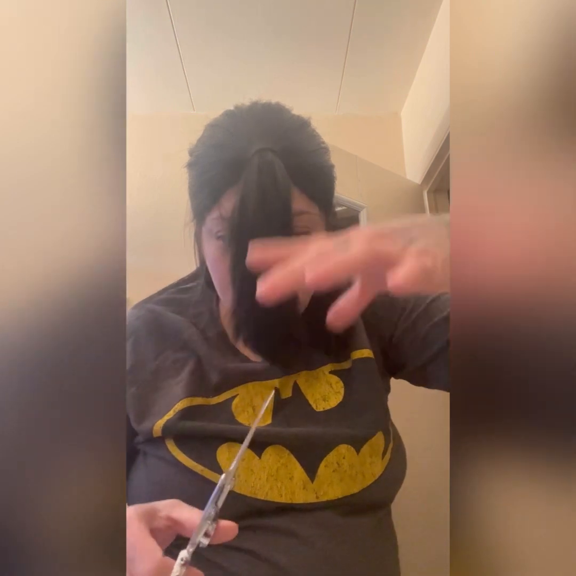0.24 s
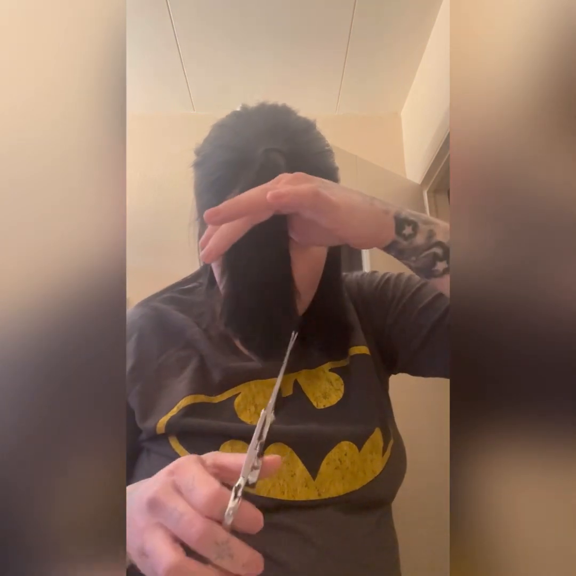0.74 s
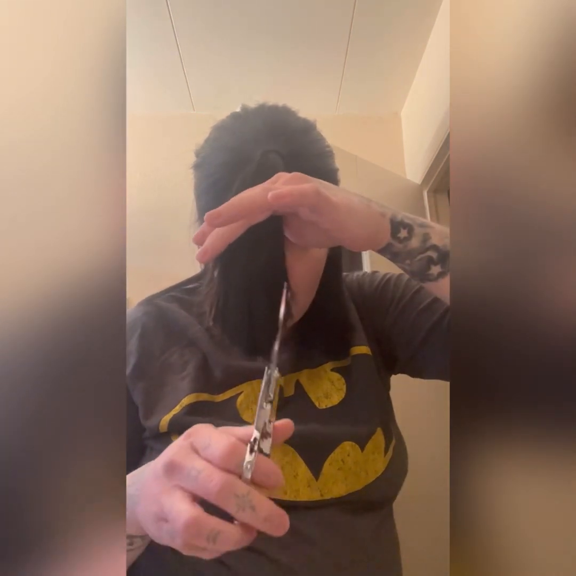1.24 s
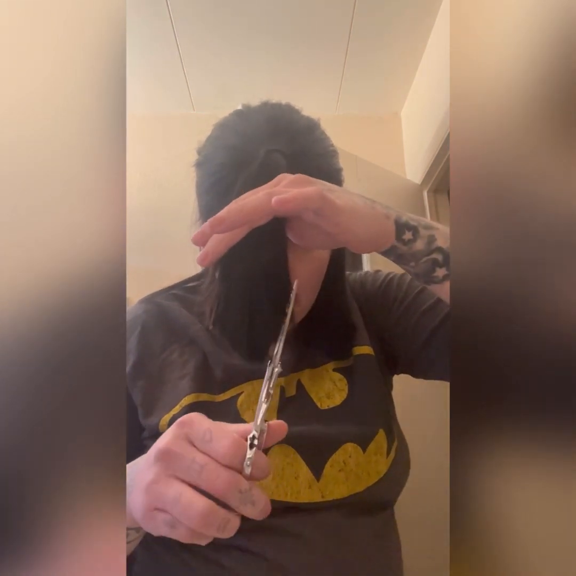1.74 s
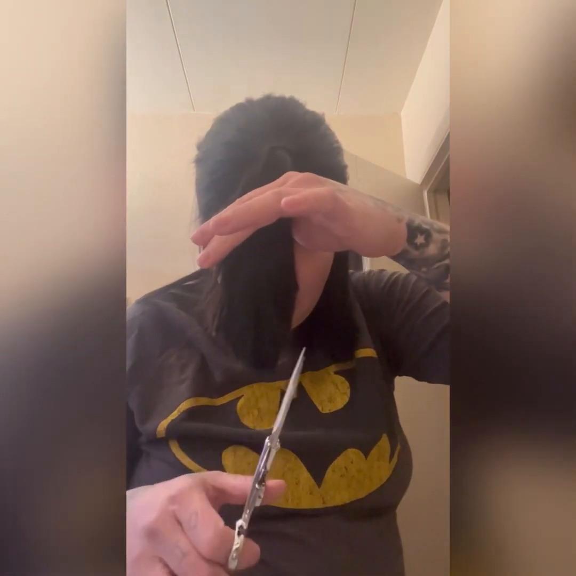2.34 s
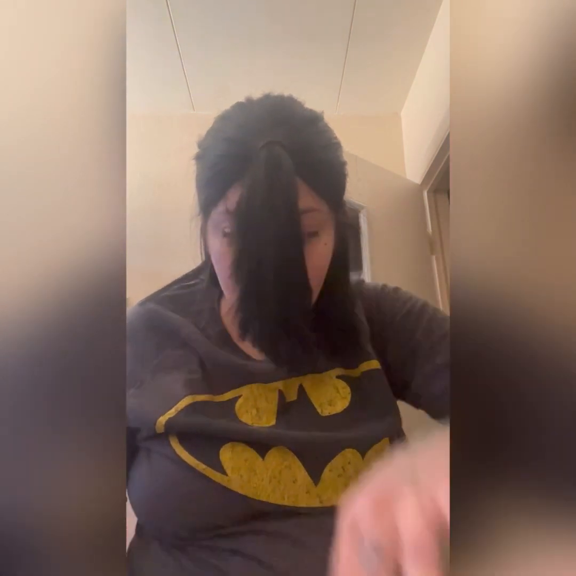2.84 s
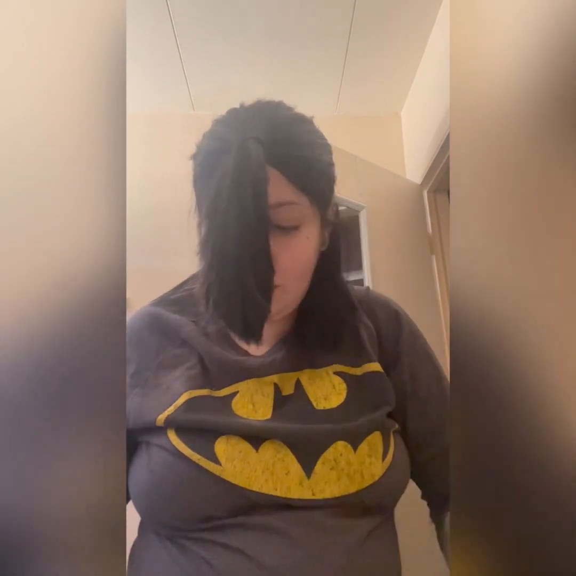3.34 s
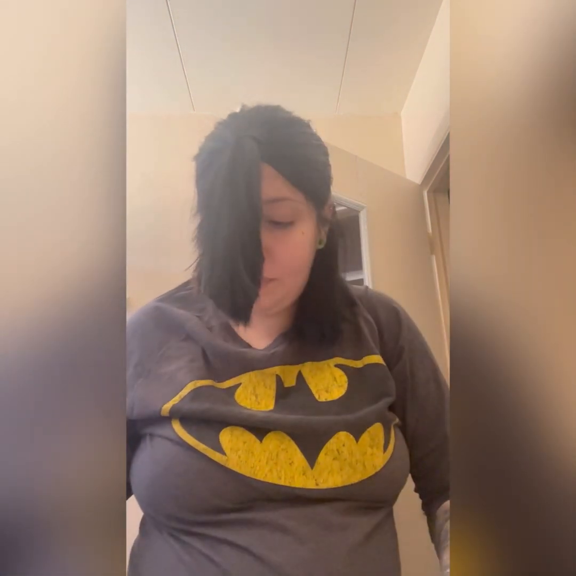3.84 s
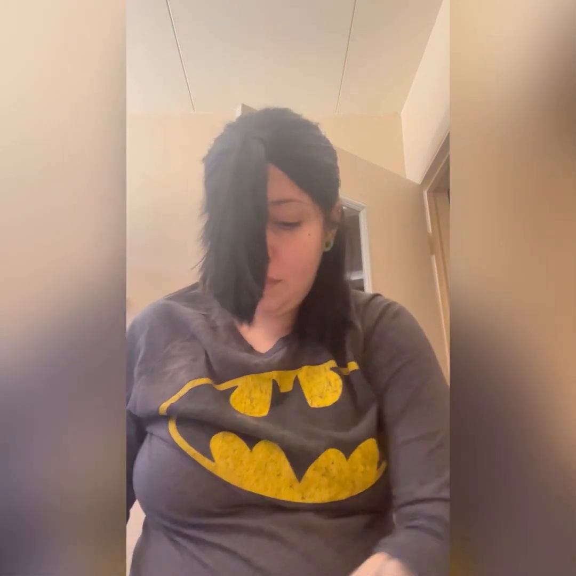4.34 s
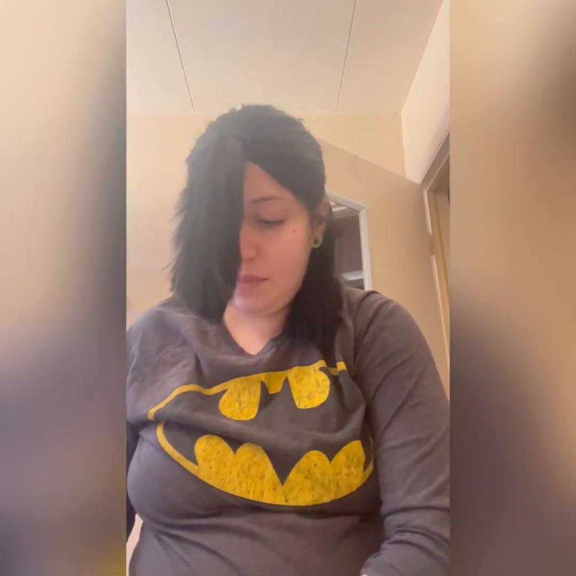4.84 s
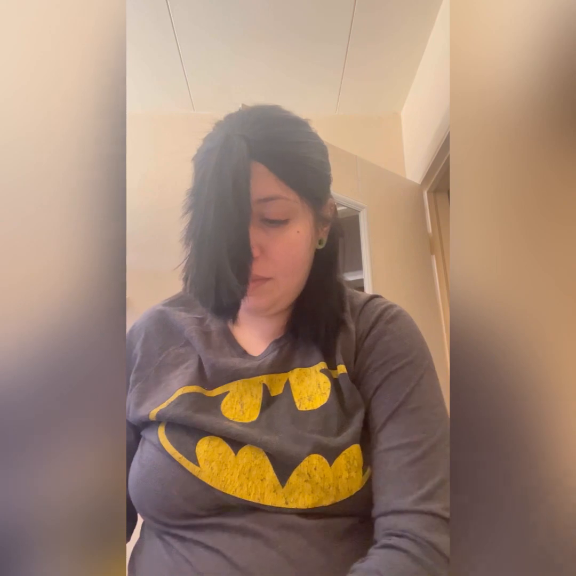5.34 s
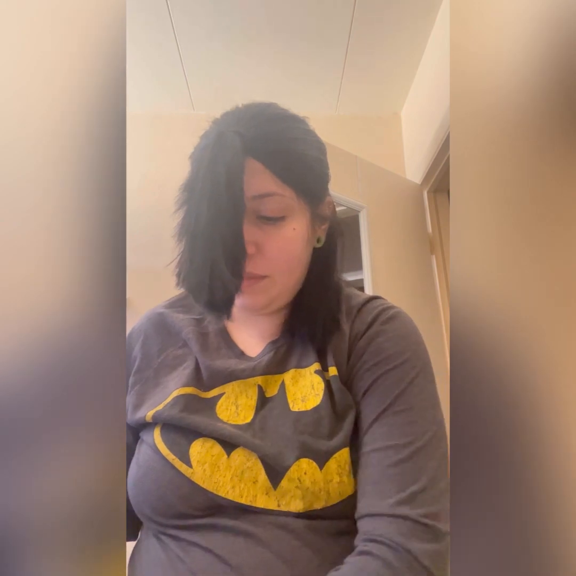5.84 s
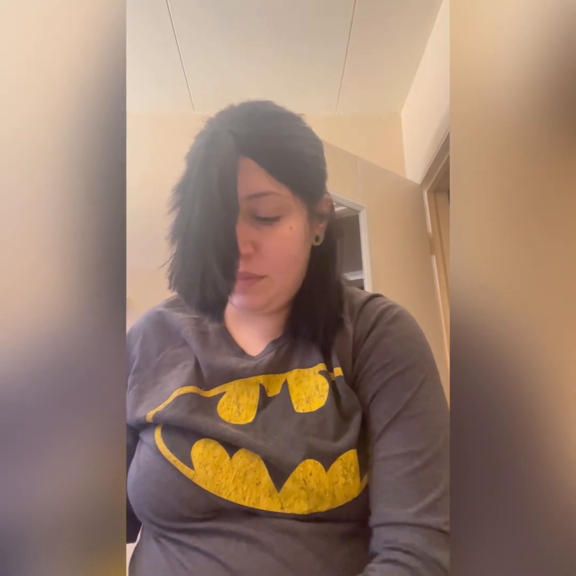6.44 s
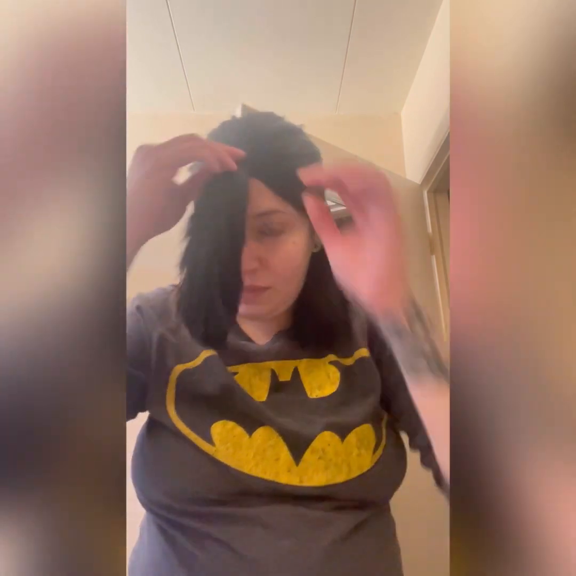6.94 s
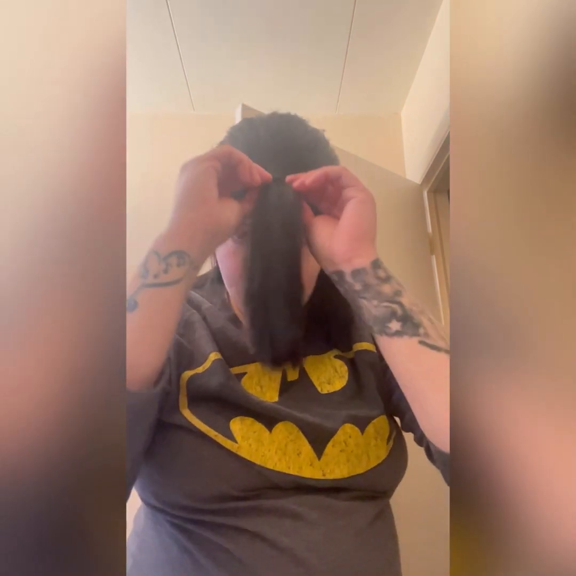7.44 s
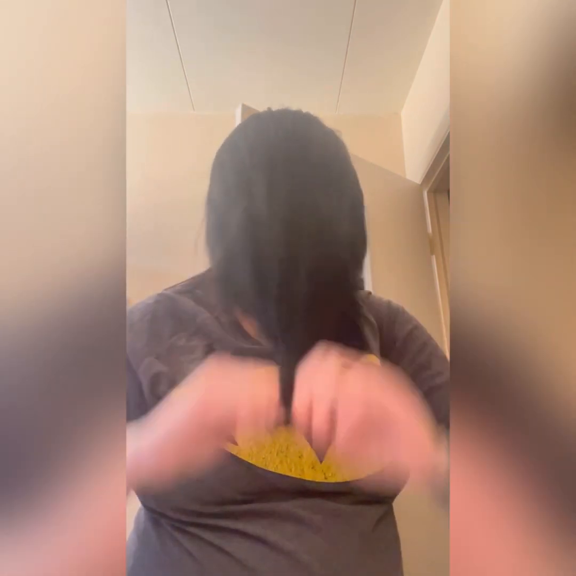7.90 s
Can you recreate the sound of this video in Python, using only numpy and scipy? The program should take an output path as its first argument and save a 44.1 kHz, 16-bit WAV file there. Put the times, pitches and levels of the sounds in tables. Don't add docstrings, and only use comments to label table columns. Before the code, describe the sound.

Quiet blade snips, soft sleeve swishes, then sharp hollow knocks and sliding clatter as scissors are put down, over faint fan drone.

```python
import sys
import numpy as np
from scipy import signal
from scipy.fft import rfft, irfft, next_fast_len
from scipy.io import wavfile

SR = 44100
rng = np.random.default_rng(int(sys.argv[2]) if len(sys.argv) > 2 else 0)


def int16_out(signal):
    q = np.round(np.clip(np.atleast_2d(signal).T, -1, 1) * 32767)
    wavfile.write(sys.argv[1], SR, q.astype(np.int16))


def gain_from_db(level_db):
    decades = np.asarray(level_db, float) / 20
    return 10 ** decades


N = 360297
TIME = np.arange(N) / SR
SIZE = next_fast_len(N + SR // 4)
HZ = np.arange(SIZE // 2 + 1) * SR / SIZE + .001

# (time [s], pitch [Hz], level [dB])
FAN_HUM = [(0.0, 85.2, -63), (0.18, 89.7, -63), (1.41, 89.8, -58.5), (1.57, 89.7, -72.5), (2.07, 93.6, -59),
           (2.21, 86.55, -71.5), (2.499, 93.03, -64), (4.35, 101.1, -70), (4.43, 104.8, -61.5),
           (4.977, 98.5, -67.5), (5.23, 106.3, -70), (5.479, 101.5, -61), (5.921, 105.1, -67),
           (7.67, 105.5, -64), (7.761, 87.2, -75.5), (7.85, 85.4, -67), (7.961, 102.3, -65),
           (8.17, 102.2, -58)]
# (peak time [s], level [dB], rise [s], fall [s])
MOAN_SWELLS = [(1.289, -78.5, 0.66, 0.42), (2.329, -77, 0.94, 0.5), (3.4, -81, 0.4, 0.58),
               (3.89, -63, 0.69, 0.38), (4.5, -61.5, 0.14, 1.35), (4.801, -73.5, .5, 0.61),
               (5.58, -58, 0.4, 0.36), (6.83, -72, 0.94, 0.38), (7.44, -63.5, 0.32, 0.75),
               (7.669, -67.5, 0.19, 1.26), (8.17, -62, 0.44, 0.21)]
# (frequency [Hz], density [dB per Hz])
AIR_SPECTRUM = [(20, -28.5), (40, -11.5), (70, 2), (110, -1), (170, -13.5), (290, -19), (500, -22.5),
                (1000, -33.5), (1900, -33.5), (3000, -39.5), (6000, -41.5), (12500, -46), (14500, -55.5),
                (16000, -61)]
# (time [s], peak level [dB], pitch [Hz], width [Hz], length [ms])
TICKS = [(1.922, -53, 3320, 2480, 3.6), (1.98, -48, 1850, 494, 5), (1.989, -58, 350, 250, 9),
         (1.296, -70, 1500, 300, 27), (3.003, -58, 3750, 200, 9.8), (1.58, -74, 6340, 600, 32),
         (1.68, -72, 7000, 900, 17), (2.986, -59, 1900, 900, 4), (3.287, -50.5, 1790, 705, 1.9),
         (3.329, -57.5, 44.08, 41.6, 16.75), (7.013, -62.5, 5000, 2980, 1.9), (7.267, -56, 2083, 982, 2.1),
         (7.536, -47, 1500, 2510, 9.7), (7.69, -37.5, 531, 308, 3.2), (7.692, -34, 1450, 593, 0.63)]
# (peak time [s], level [dB], rise [s], fall [s])
GRAZES = [
    (1.31, -77.5, 0.11, 0.13),
    (1.44, -81, 0.09, 0.079),
    (1.57, -83, 0.064, 0.13),
    (1.69, -72, 0.16, 0.12),
    (1.8, -83.5, .08, 0.036),
]
# (frequency [Hz], width [Hz], level [dB])
GRAZE_MODES = [(1400, 670, -6.5), (1990, 270, 2)]
# (bite time [s], ring level [dB], hiss above ring [dB], closing [s], letting go [s])
BLADE_STROKES = [(1.634, -82.5, -2.5, 0.079, 0.05), (1.684, -89, 6, 0.043, 0.17),
                 (1.77, -101, 10, 0.15, 0.44), (1.839, -62, -23, 0.014, 0.059),
                 (1.924, -55, -25, 0.011, 0.058), (1.955, -63, -15, 0.048, 0.017),
                 (1.978, -53.5, -15, 0.007, 0.018), (2.144, -77.5, 4, 0.017, 0.062),
                 (2.175, -68, -13.5, 0.053, 0.058), (2.922, -88, 3, 0.015, 0.047),
                 (2.998, -74.5, 7, 0.03, 0.055), (3.474, -81.5, 2, 0.034, 0.022),
                 (3.5, -78, -58, 0.046, .02)]
# (frequency [Hz], width [Hz], level [dB])
BLADE_MODES = [(1130, 280, -11), (1850, 42, 4.5), (2310, 69, -9), (2890, 71, -7), (3570, 84, -3.5)]
GRIND_MODES = [(3900, 450, -8.5), (4800, 1200, -14), (7850, 4100, -12.5)]
HISS_MODES = [(7960, 490, -5.5), (10610, 250, 1), (12150, 580, -9.5), (14200, 2900, -11)]
# (peak time [s], swish level [dB], rub above swish [dB], rise [s], fall [s])
SLEEVES = [(2.62, -83, -34, 0.38, 0.43), (2.9, -70, -16, 0.41, 0.3), (3.215, -70.5, -8, 0.033, 7.2),
           (3.469, -64, -16, 0.36, 1.3), (3.717, -58, -9, 0.5, 0.69), (3.882, -60, -4.5, 0.57, 0.18),
           (4.201, -66.5, -16, 0.69, 1.06), (5.352, -57, -27, 0.076, 0.54), (5.618, -63, -1, 2.4, 0.28),
           (5.901, -70.5, -9.5, 1, 0.27), (6.151, -86.5, 4.5, 1, 7.8), (6.829, -57.5, -14, 0.51, 0.36),
           (7.351, -76.5, 8.5, 0.19, 2.24), (7.701, -58.5, -9.5, 0.65, 1.3), (7.9, -79, -34, 1.1, 0.6),
           (8.1, -78.5, -4.5, 0.32, 0.76)]
# (start time [s], length [s], brush level [dB], sheen above brush [dB])
COMBING = [
    (2.7, 0.33, -105, 11),
    (3.306, 0.5, -110, 29),
    (6.723, 0.32, -104, 13.5),
    (7.1, 0.15, -91, -3.5),
    (7.551, 0.36, -70.5, -4.5),
    (7.925, 0.41, -108, 39.5),
]
# (frequency [Hz], width [Hz], level [dB])
RUB_MODES = [(165, 350, 6), (403, 290, 9.5), (925, 930, -7.5)]
SWISH_MODES = [(1500, 670, -5), (2480, 520, -0.5)]
SHEEN_MODES = [(2710, 730, 4), (3510, 1400, 4), (4620, 2500, -24.5)]
BRUSH_MODES = [(4200, 1800, 9.5), (6280, 330, 13.5), (9350, 12000, 7.5), (13400, 15000, -16)]
# (time [s], peak level [dB], main ring [Hz], thud level [dB], crack level [dB])
KNOCKS = [(3.5045, -31, 1792, -6, -47), (3.7385, -31, 1742, -11, -18), (3.788, -20.5, 1656, -9, -12.5),
          (4.2715, -28.5, 1738, -10, -19), (4.3865, -32.5, 1690, -2.5, -12.5), (4.4592, -6, 1709, -18, -9),
          (4.4655, -20.5, 2412, -39, -19.5), (5.175, -25, 1709, -5, -11), (5.182, -32, 2330, -11.5, -13),
          (5.378, -31.5, 1725, -12.5, -13), (5.412, -22, 1690, -10, -16.5), (5.5245, -30, 2430, -16, -11.5),
          (5.531, -27, 2275, -10, -30), (5.5845, -28.5, 1690, -44.5, -27),
          (5.6192, -28, 1758, -26.5, -15.5), (5.742, -29, 1690, -13.5, -15),
          (5.7465, -32, 1713, -18.5, -20)]
# (time [s], peak level [dB], main ring [Hz])
TAPS = [(3.55, -38, 1895), (3.559, -41.5, 1820), (3.584, -45, 1920), (3.624, -52.5, 2330),
        (3.699, -51.5, 2400), (3.996, -48.5, 1350), (4.048, -59, 2330), (4.0608, -44, 1400),
        (4.079, -56.5, 1320), (4.104, -62.5, 1400), (5.3548, -46.5, 1250)]
BOUNCES = [(3.7957, -27, 2063), (3.813, -26.5, 1853), (4.451, -30, 1720), (4.4744, -17.5, 2063),
           (4.48, -23.5, 2063), (4.505, -34, 1690), (4.7271, -44, 1680), (5.192, -30, 1776),
           (5.197, -44, 1720), (5.2065, -32, 1700), (5.434, -27, 1710), (5.464, -34, 1690),
           (5.536, -31, 1740), (5.626, -32.5, 1710), (5.641, -57.5, 1740), (5.762, -28.5, 1727),
           (5.778, -37, 2063), (5.8417, -40, 1820), (4.076, -50.5, 1360), (5.424, -33.5, 1700),
           (5.445, -35, 1700), (5.485, -46, 1720), (5.634, -34, 1700)]
# (time [s], peak level [dB], pitch [Hz], t60 [s])
PART_NOTES = [(3.507, -48, 978, 0.026), (3.508, -44, 3300, 0.024), (3.55, -47, 927, 0.048),
              (3.552, -57, 3990, 0.04), (3.552, -53, 3150, 0.049), (3.583, -49, 959.5, 0.099),
              (3.626, -48.5, 874, 0.03), (3.742, -41, 3037, 0.03), (3.789, -33.5, 825, 0.065),
              (3.789, -37.5, 392.4, 0.04), (3.792, -30, 3692, 0.067), (3.978, -44.5, 417.6, 0.033),
              (3.998, -49, 414, .05), (3.997, -51.5, 2872, 0.045), (4.029, -65, 416.7, .04),
              (4.063, -61, 400, 0.055), (4.273, -41, 381.3, 0.063), (4.274, -39.5, 1393, .03),
              (4.391, -42, 1300, 0.043), (3.999, -51, 2372, 0.05), (4.276, -55, 5320, 0.3),
              (4.387, -38.5, 757, 0.049), (4.389, -44, 408, .1), (4.461, -30, 3630, 0.04),
              (4.46, -26, 5267, .03), (4.472, -28, 5467, 0.032), (4.463, -31, 412.6, 0.045),
              (4.92, -71, 3700, 0.11), (5.128, -59.5, 4560, 0.21), (5.178, -33.5, 774, 0.043),
              (5.178, -39, 385, 0.0365), (5.177, -26, 1717, .03), (5.184, -36.5, 5400, 0.04),
              (5.21, -44, 818, 0.037), (5.413, -27, 2290, 0.029), (5.413, -39, 763, .05),
              (3.793, -28, 2318, 0.065), (3.82, -59, 5340, .5), (3.995, -67, 5330, 0.21),
              (5.748, -36, 2063, .12), (5.749, -43.5, 324, 0.042), (5.742, -43.5, 826, 0.022),
              (4.776, -53, 1700, .03), (4.775, -61, 2150, 0.066), (3.885, -48, 920, 0.053),
              (5.182, -33.5, 3670, 0.068), (5.357, -52, 760, 0.04), (5.414, -37, 400, 0.0737),
              (5.535, -43.5, 5350, 0.045), (5.623, -40, 3680, 0.052), (5.746, -52, 5400, 0.096),
              (5.523, -36, 2890, 0.022), (5.623, -41, 2410, 0.033), (5.97, -58.5, 1264, 0.25)]
# (pitch [Hz], level [dB], t60 [s])
BODY = [(1910, -13.5, 0.015), (2063, -9, 0.076), (2330, -1.5, 0.04), (1303, -18, 0.04), (1570, -22, .03),
        (2134, -20.5, 0.014), (2480, -17, 0.049), (1250, -25, 0.14)]
THUD = [(136, -3.5, .06), (345, -8, 0.079), (361, 6.5, 0.038), (490, 0, 0.033), (786, 2, 0.025),
        (879.5, 0.5, 0.047), (947, -5, 0.099)]
STEEL = [(3200, -7, .03), (3668, -6, .05), (3840, -8, .05), (4119, -13, .04), (5300, -10, .04),
         (6384, -12, .04), (4560, -11, .05), (2750, -8, .04), (3630, -17, .06), (5331, -17, .09),
         (6100, -14, .03), (5630, -19, .04), (7080, -14, .04)]
# (frequency [Hz], width [Hz], level [dB])
CRACK_MODES = [(2860, 3120, 7.5), (3820, 1400, 2.5), (5666, 1200, 4), (7200, 4200, 4.5), (9500, 2200, -9),
               (12116, 1300, -9)]
# (frequency [Hz], level [dB])
SCUFF_SPECTRUM = [(100, -11), (300, 1), (700, -1), (1300, -2.5), (2200, 2.5), (2800, -4.5), (4000, -7.5),
                  (7000, -20), (12000, -40)]
# (peak time [s], level [dB], rise [s], fall [s])
SLIDES = [(4.894, -59, 0.021, 0.022), (4.912, -65.5, 0.028, 0.019), (4.933, -49, 0.026, 0.02),
          (4.99, -65.5, 0.01, 0.016), (5.01, -64, 0.017, 0.035), (5.033, -58, 0.043, 0.0089),
          (5.06, -55.5, 0.013, 0.016), (5.121, -51.5, 0.0097, 0.028), (5.131, -48.5, 0.0088, 0.073),
          (5.149, -47, 0.017, 0.015), (5.171, -35.5, 0.019, .03), (4.494, -18, 0.027, 0.01),
          (4.467, -16.5, .012, 0.0059), (6.084, -66, 0.074, 0.056), (5.187, -25, .025, .02),
          (5.85, -52, .06, .2), (5.95, -58, .1, .06)]
DRAGS = [(5.79, -47.5, 0.039, 0.091), (5.43, -43.5, 0.018, 0.18), (4.52, -39.5, 0.038, 0.27),
         (5.209, -47.5, .02, 0.13), (3.829, -46.5, 0.029, .2), (3.6, -58, .06, .1), (3.66, -60, .04, .06),
         (4.3, -52, .02, .15), (4.07, -54, .02, .06), (3.93, -56, .05, .08), (5.357, -48, 0.016, 0.055),
         (5.403, -41, 0.04, 0.045), (5.446, -48, 0.016, 0.034), (5.483, -46.5, 0.026, 0.059),
         (5.515, -45.5, 0.022, 0.062), (5.66, -54, 0.011, 0.06), (5.826, -56, 0.017, 0.063),
         (5.868, -52, 0.12, 0.17), (5.919, -59.5, 0.1, 0.05), (5.971, -61, 0.088, 0.035),
         (6.084, -66, 0.097, 0.084)]
# (frequency [Hz], width [Hz], level [dB])
SLIDE_MODES = [(1690, 71, 7), (2330, 150, -15), (3670, 80, -43), (4560, 74, -38), (5370, 27, -40),
               (1260, 20, -8.5)]
DRAG_MODES = [(550, 70, -14), (800, 70, -16), (1290, 60, -4), (1730, 90, 2), (2090, 60, -6), (2270, 80, -5),
              (3680, 90, -18)]
# (octave centre [Hz], t60 [s])
ROOM_T60 = [(125, 0.57), (250, 0.51), (500, 0.72), (1000, 0.32), (2000, 0.15), (4000, 0.3), (8000, 0.33),
            (14000, 0.047)]
# (frequency [Hz], left minus right [dB], right leads by [rad],
# likeness of diffuse sound [0-1])
PORTS = [(20, 4.5, 0, 1), (168, 4.5, 0.5, 0.91), (400, 5, 1.1, .55), (920, 6, 2.6, 0.5),
         (1400, 5.5, 1.6, 0.3), (1700, 9.5, 1.78, 0.7), (2912, 3, 2.3, 0), (3710, 5, 3, 0),
         (5000, 0.14, 4.6, .15), (6500, 0.5, 5, 0.7), (8000, 0.5, 3.2, .95), (10400, 0, 3, 0.95),
         (12500, 1, 0.5, 0.1), (16200, -0.5, -0.3, .4)]
# (frequency [Hz], left minus right [dB], right leads by [rad])
COUNTER_SIDE = [(200, -2, -.2), (400, -8, 0.1), (563, -1.5, 0.7), (795, 0.5, -2), (1099, 3.5, -0.25),
                (1240, -1, -0.2), (2430, 5, 0.8), (5000, 2.5, -0.03), (12900, -6, 0.48)]

MAINS_HZ, MAINS_DB, HUM_FLUTTER_DB = 125, -84, 2.4
MOAN_HZ, MOAN_DB = 281, -98.5
AIR_DB = -68
SWELL_DB = 30
GRIND_DB, GRIND_SHARE = 0, 0.79
FIBRE_SCATTER_DB, FIBRE_FLICKER_DB = 1.6, 1.5
SWISH_EDGE_HZ, SHEEN_EDGE_HZ = 2620, 3600
SHEEN_DB, SHEEN_GROWTH = -21, 0.11
COMB_EDGE_S = 0.068
TAP_THUD_DB, TAP_CRACK_DB = -8, -32
BOUNCE_THUD_DB, BOUNCE_CRACK_DB = -34.5, -24.5
RATTLE_MS, NOTE_RISE_MS, GRAIN_DB = 1.9, 3.2, 5
RING_T60_S = .028
CRACK_GROWTH = 1.835
CLATTER_DB, CLATTER_MS = -2.5, 3.4
SING_HZ, SING_WAVER, SING_GRIT_DB = 1700, .004, -12
TOP_HZ = 15850


def unit(x):
    return x / np.sqrt(np.mean(x ** 2))


def shaped(x, gain):
    return irfft(rfft(x, SIZE) * gain, SIZE)[..., :N]


def resonance(hz, width):
    return 1 / (1 + 1j * (HZ - hz ** 2 / HZ) / width)


def resonate(x, modes):
    gain = 0
    for k, (hz, width, db) in enumerate(modes):
        gain = gain + (-1) ** k * gain_from_db(db) * resonance(hz, width)
    return unit(shaped(x, gain))


def by_pitch(table):
    hz, *columns = np.transpose(table)
    return [np.interp(np.log(HZ), np.log(hz), column) for column in columns]


def walk(rate):
    return np.interp(TIME * rate, np.arange(1000), rng.standard_normal(1000))


def grit(scatter_db, flicker_db, rate):
    level_db = scatter_db * rng.exponential(size=N) + flicker_db * walk(rate)
    return rng.standard_normal(N) * gain_from_db(level_db)


def swell(s, db, rise, fall, hold=0):
    step = 16
    t = TIME[::step]
    before = np.maximum((s - t) / max(rise, .002), 0)
    after = np.maximum((t - s - hold) / max(fall, .002), 0)
    return np.repeat(gain_from_db(db - SWELL_DB * (before + after)), step)[:N]


def swells(table):
    return sum(swell(*row) for row in table)


def burst(chance, ms, soft=0.58):
    u = TIME[:len(chance)] * 1000 / np.clip(ms, .2, 30)
    return chance * u ** soft * np.exp(-u)


def add_at(track, s, sound):
    i = int(s * SR)
    track[i:i + len(sound)] += sound


def fan():
    s, hz, db = np.transpose(FAN_HUM)
    motor_hz = np.interp(TIME, s, hz) * (1 + 0.018 * walk(5.1))
    motor_db = np.interp(TIME, s, db) + HUM_FLUTTER_DB * (walk(13) + walk(28))
    motor = gain_from_db(motor_db) * np.sin(2 * np.pi * np.cumsum(motor_hz) / SR)
    mains = gain_from_db(MAINS_DB) * np.sin(2 * np.pi * MAINS_HZ * TIME)
    turn = 2 * np.pi * MOAN_HZ * TIME
    moan = walk(28) * np.sin(turn) + walk(49) * np.cos(turn)
    moan_gain = gain_from_db(6.0) * (gain_from_db(MOAN_DB) + swells(MOAN_SWELLS))
    return np.sqrt(2) * (motor + mains) + moan_gain * moan


def air():
    hush = shaped(rng.standard_normal((2, N)), gain_from_db(by_pitch(AIR_SPECTRUM)[0]))
    return gain_from_db(AIR_DB + 1.2 * walk(1.0)) * unit(hush)


def ticks():
    out = np.zeros(N)
    for (s, db, hz, width, ms), chance in zip(TICKS, rng.standard_normal((len(TICKS), 4096))):
        peak = signal.iirpeak(hz, hz / width, SR)
        tick = signal.lfilter(*peak, burst(chance, ms))
        tick = signal.lfilter(*peak, tick)
        add_at(out, s, gain_from_db(db) * tick / np.abs(tick).max())
    return out


def graze():
    return swells(GRAZES) * resonate(grit(2.4, 5.7, 49.14), GRAZE_MODES)


def scissors():
    ring_gain, grind_gain, hiss_gain = 0, 0, 0
    for s, db, hiss, closing, release in BLADE_STROKES:
        ring_gain = ring_gain + swell(s, db, closing, release)
        grind_gain = grind_gain + swell(s, db + GRIND_DB + GRIND_SHARE * hiss, closing, release)
        hiss_gain = hiss_gain + swell(s, db + hiss, closing, release)
    rub = grit(0.41, 2.6, 77)
    blades = gain_from_db(-2.0) * ring_gain * resonate(rub, BLADE_MODES)
    grind = gain_from_db(5.5) * grind_gain * resonate(rub, GRIND_MODES)
    hiss = gain_from_db(14) * hiss_gain * resonate(rub, HISS_MODES)
    return blades + grind + hiss


def cloth():
    fibres = grit(FIBRE_SCATTER_DB, FIBRE_FLICKER_DB, 28)
    rub = gain_from_db(2) * resonate(fibres, RUB_MODES)
    swish = gain_from_db(-3) * resonate(fibres, SWISH_MODES)
    sheen = gain_from_db(4) * resonate(fibres, SHEEN_MODES)
    brush = gain_from_db(4) * resonate(fibres, BRUSH_MODES)
    swish = shaped(swish, 1 / (1 + (HZ / SWISH_EDGE_HZ) ** 20))
    sheen = shaped(sheen[::-1], 1 / (1 + (HZ / SHEEN_EDGE_HZ) ** 20))
    out = 0
    for s, db, rub_db, rise, fall in SLEEVES:
        sheen_db = SHEEN_DB + SHEEN_GROWTH * (db + 64.0)
        out = out + swell(s, db, rise, fall) * (swish + gain_from_db(rub_db) * rub + gain_from_db(sheen_db) * sheen)
    for s, length, db, sheen_db in COMBING:
        out = out + swell(s, db, COMB_EDGE_S, COMB_EDGE_S, length) * (brush + gain_from_db(sheen_db) * sheen)
    return out


def ring(modes, t, luck):
    hz, db, t60 = np.transpose(modes)[..., None]
    a, b = luck[:len(modes), None], luck[-len(modes):, None]
    decay = gain_from_db(db + 3.1 * a) * np.exp(-np.log(1000) * t / t60)
    turn = 2 * np.pi * (hz * (1 + 0.0032 * b) * t + a - b)
    return np.sum(decay * np.sin(turn), axis=0)


def contact(t, ms, chance):
    build_up = (1 - np.exp(-t * 1000 / max(ms, .1))) ** 2
    return build_up * gain_from_db(GRAIN_DB * np.interp(t * 350, np.arange(len(chance)), chance))


def struck(bell, push):
    sound = bell * push
    return sound / np.abs(sound).max()


def knocks():
    dull, bright, cracks, scuff = np.zeros((4, N))
    t = TIME[:SR // 5]
    hits = KNOCKS + [(*row, TAP_THUD_DB, TAP_CRACK_DB) for row in TAPS]
    hits = hits + [(*row, BOUNCE_THUD_DB, BOUNCE_CRACK_DB) for row in BOUNCES]
    lucks = rng.standard_normal((len(hits), 14))
    chatters = rng.standard_normal((len(hits), 1024))
    for (s, db, hz, thud_db, crack_db), luck, chatter in zip(hits, lucks, chatters):
        push = contact(t, RATTLE_MS, chatter)
        main = struck(ring([(hz, 0, RING_T60_S)], t, luck), push)
        body = gain_from_db(-7) * struck(ring(BODY, t, luck), push)
        thud = gain_from_db(thud_db + 1.5) * struck(ring(THUD, t, luck[::-1]), push)
        steel = struck(ring(STEEL, t, luck), push)
        add_at(dull, s, gain_from_db(db) * (main + body + thud))
        add_at(bright, s, gain_from_db(db + crack_db + 5.0) * steel)
        add_at(scuff, s, gain_from_db(db + CLATTER_DB) * burst(chatter, CLATTER_MS))
        crack = burst(chatter[::-1], 1.55 * RATTLE_MS)
        add_at(cracks, s, gain_from_db(db + CRACK_GROWTH * crack_db + 18.0) * crack)
    for (s, db, hz, t60), luck in zip(PART_NOTES, rng.standard_normal((len(PART_NOTES), 128))):
        note = struck(ring([(hz, 0, t60)], t, luck), contact(t, NOTE_RISE_MS, luck))
        add_at(bright, s, gain_from_db(db) * note)
    crack_colour = np.abs(sum(gain_from_db(db) * resonance(hz, width) ** 2 for hz, width, db in CRACK_MODES))
    crack_colour = crack_colour / (1 + (HZ / 15700) ** 10)
    soft_contact = 1 / (1 + (150 / HZ) ** 2) / (1 + (HZ / 3800) ** 4)
    rings = shaped(dull, soft_contact) + bright
    clatter = shaped(scuff, gain_from_db(by_pitch(SCUFF_SPECTRUM)[0])) + shaped(cracks, crack_colour)
    return rings, clatter


def slide():
    rub = grit(1.4, 1.1, 60)
    sing_hz = SING_HZ * (1 + SING_WAVER * walk(40))
    note = np.sqrt(2) * np.sin(2 * np.pi * np.cumsum(sing_hz) / SR)
    sing = note + gain_from_db(SING_GRIT_DB) * resonate(rub, SLIDE_MODES)
    return swells(SLIDES) * sing + swells(DRAGS) * resonate(rub, DRAG_MODES)


def room(x):
    t, tail = np.arange(SR) / SR, 0
    for hz, t60 in ROOM_T60:
        band = signal.butter(2, [hz / 1.45, hz * 1.45], "band", fs=SR, output="sos")
        octave = signal.sosfilt(band, rng.standard_normal((2, SR)))
        tail = tail + octave * np.exp(-np.log(1000) * t / t60)
    tail = tail * np.clip(t / 0.0024, 0, 1)
    tail = tail / np.sqrt(np.sum(tail ** 2) / 2)
    return signal.fftconvolve(x[None], tail, axes=1)[:, :N]


def scene():
    scrape = slide()
    rings, clatter = knocks()
    counter = scrape + rings + clatter
    close = scissors() + graze() + ticks() + cloth()
    sent = gain_from_db(-10.5) * (scrape + rings) + gain_from_db(-5.5) * clatter + gain_from_db(-10.5) * close
    diffuse = room(sent) + air()
    counter, direct, first, second = rfft([counter, close + fan(), *diffuse], SIZE)
    pan_db, lead, like = by_pitch(PORTS)
    like = np.clip(like, 0, 1)
    half = gain_from_db(pan_db / 2) * np.exp(-.5j * lead)
    extra_db, extra_lead = by_pitch(COUNTER_SIDE)
    aside = gain_from_db(extra_db / 2) * np.exp(-.5j * extra_lead)
    left = (counter * aside + direct + first) * half
    right_diffuse = like * first + np.sqrt(1 - like ** 2) * second
    right = (counter / aside + direct + right_diffuse) / half
    return irfft([left, right], SIZE)[:, :N]


def roll_off(x):
    return signal.sosfilt(signal.butter(12, 16640, fs=SR, output="sos"), x)


def record(dry):
    rounded = np.tanh(dry)
    top_cut = gain_from_db(-45.5 * np.clip((HZ - TOP_HZ + 300) / 600, 0, 1) ** 2)
    return roll_off(shaped(rounded, top_cut))


dry = scene()
out = record(dry)
int16_out(out)
```